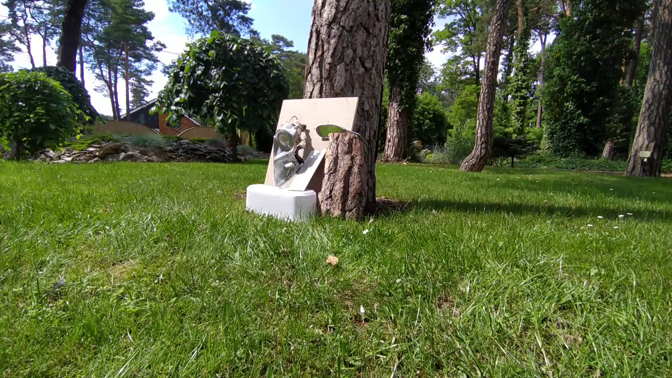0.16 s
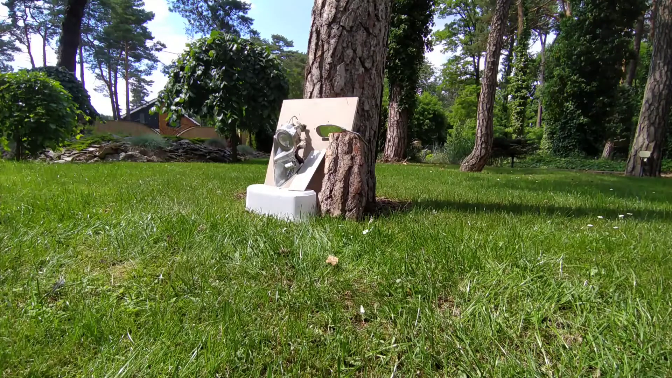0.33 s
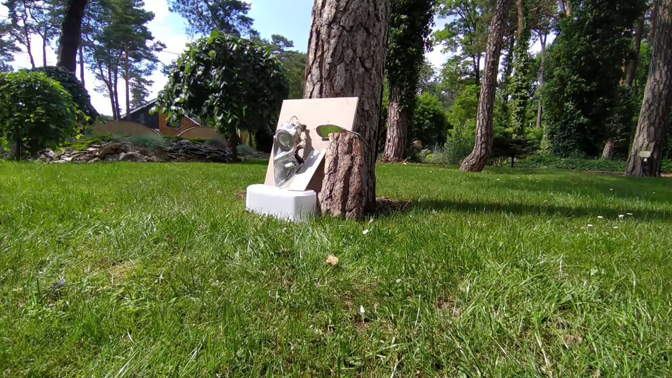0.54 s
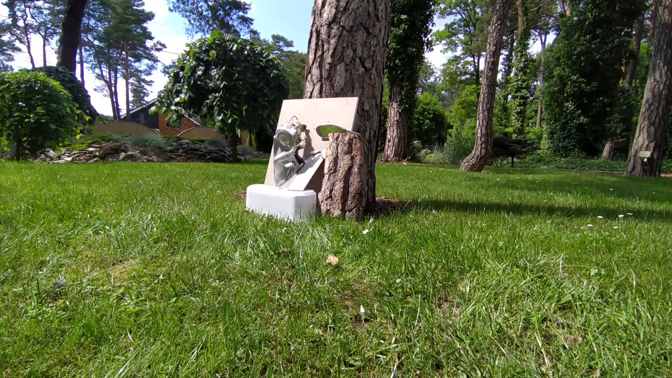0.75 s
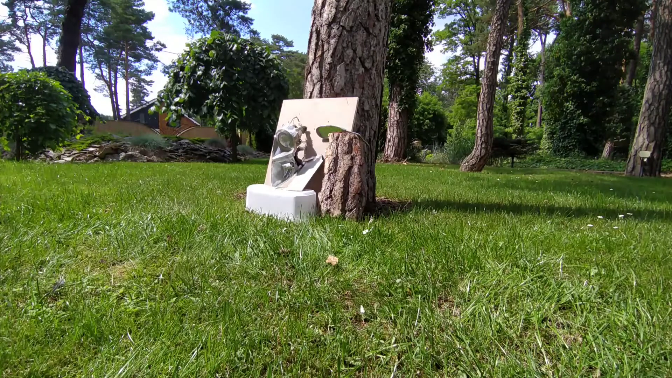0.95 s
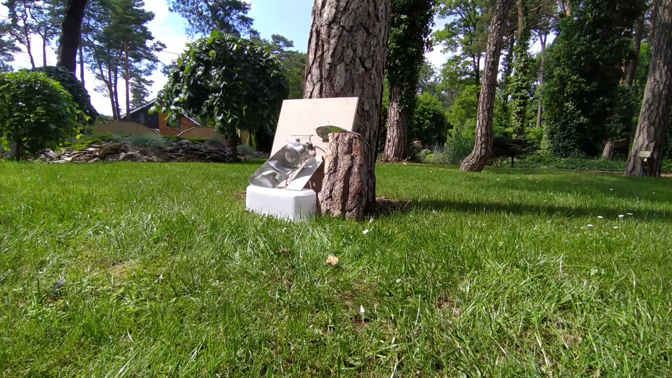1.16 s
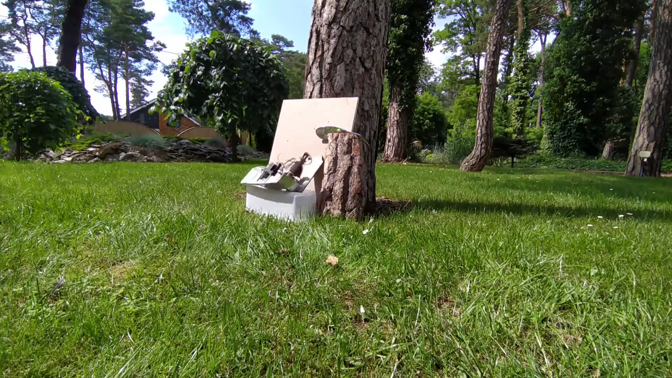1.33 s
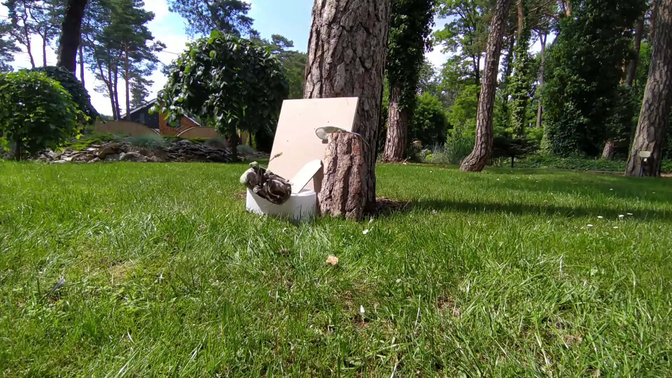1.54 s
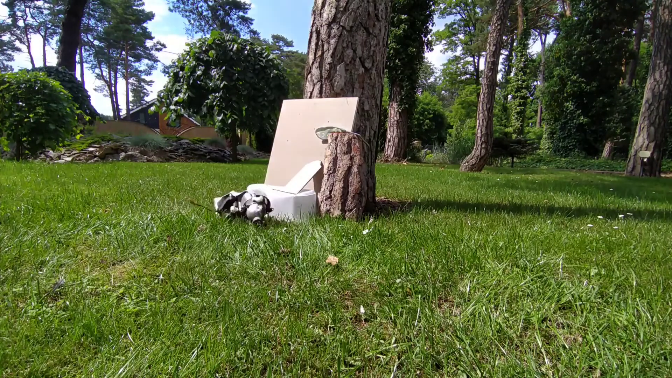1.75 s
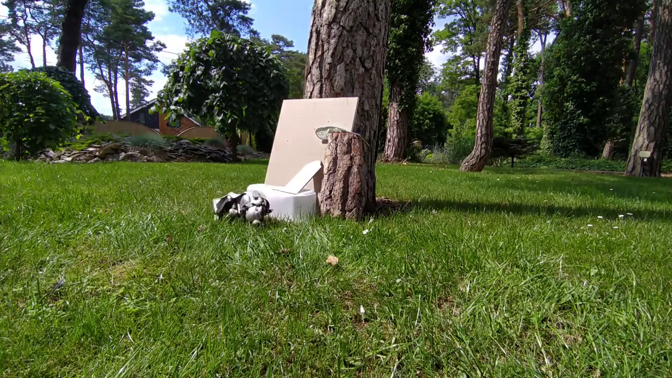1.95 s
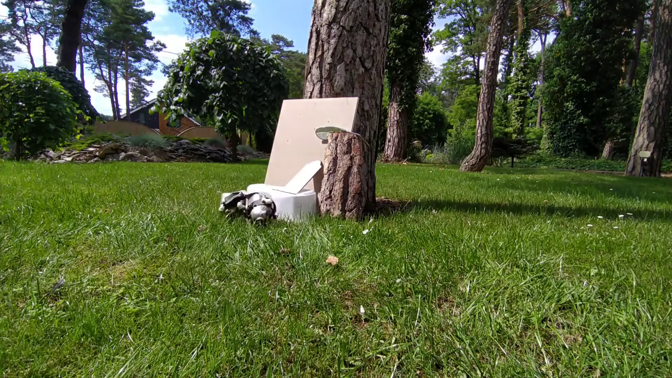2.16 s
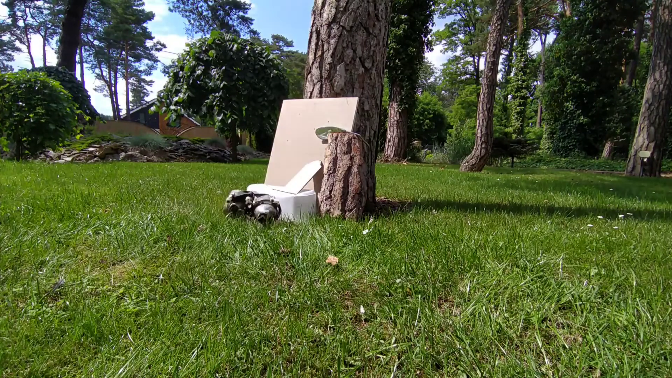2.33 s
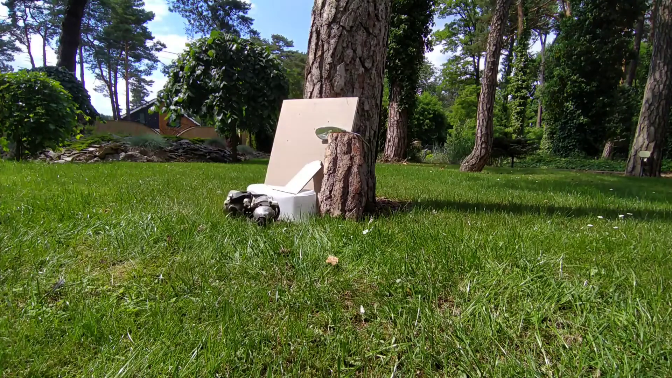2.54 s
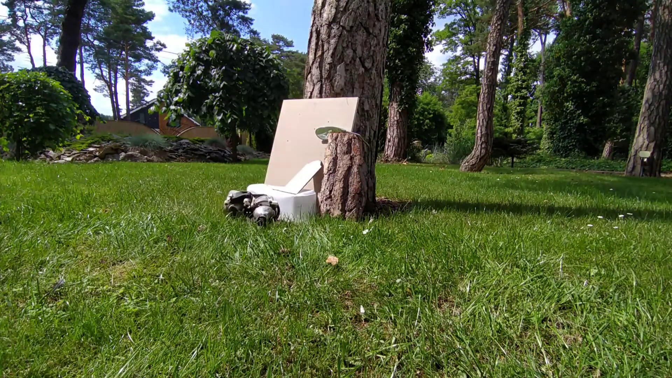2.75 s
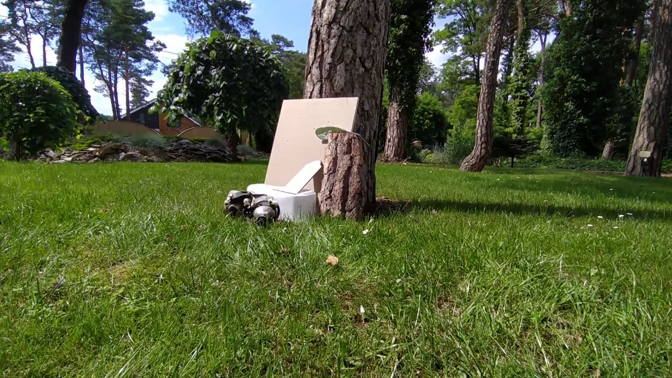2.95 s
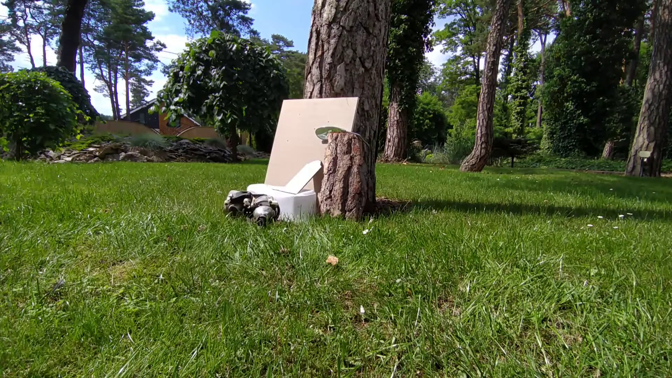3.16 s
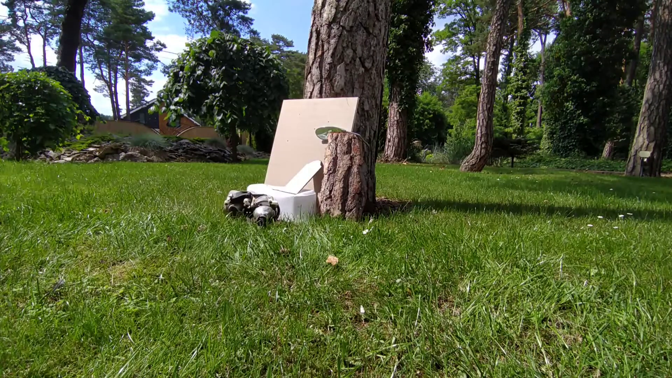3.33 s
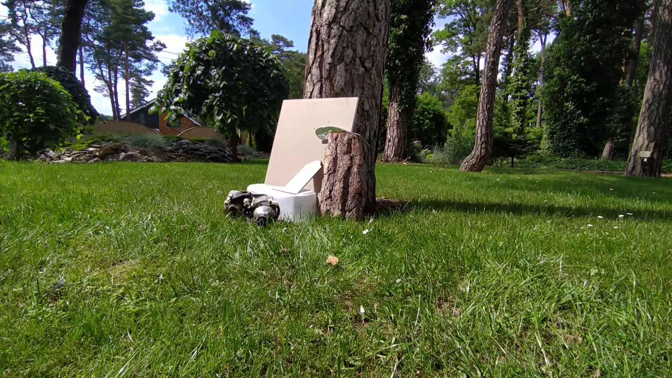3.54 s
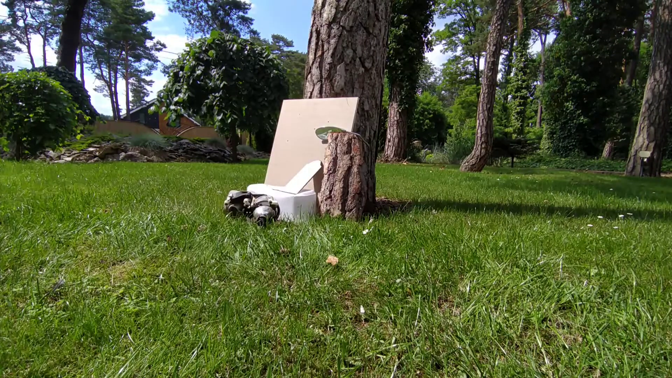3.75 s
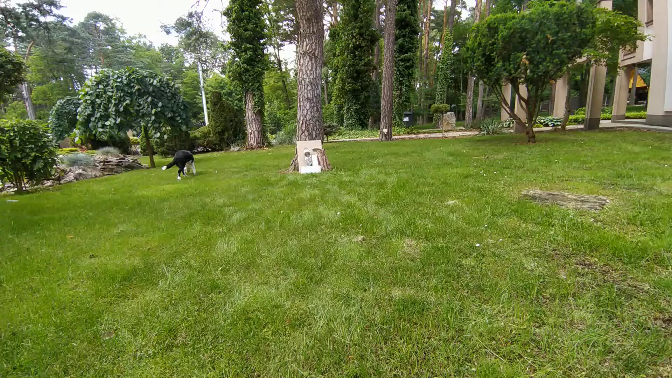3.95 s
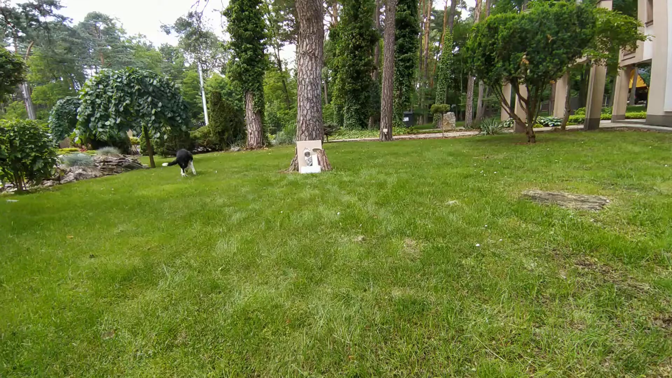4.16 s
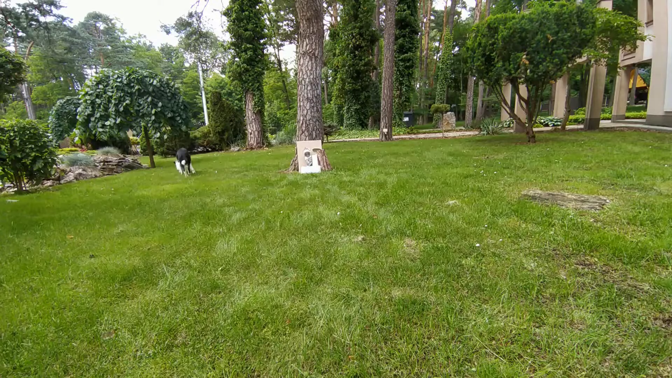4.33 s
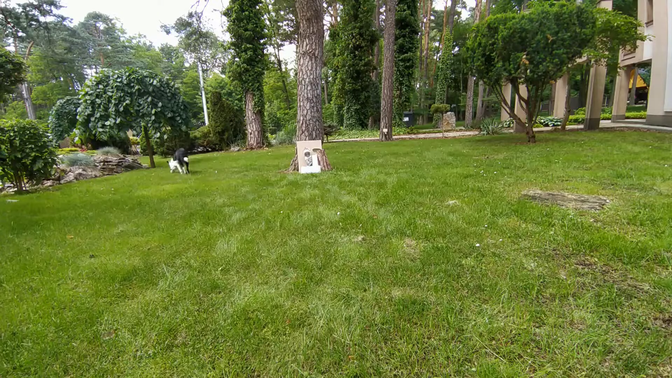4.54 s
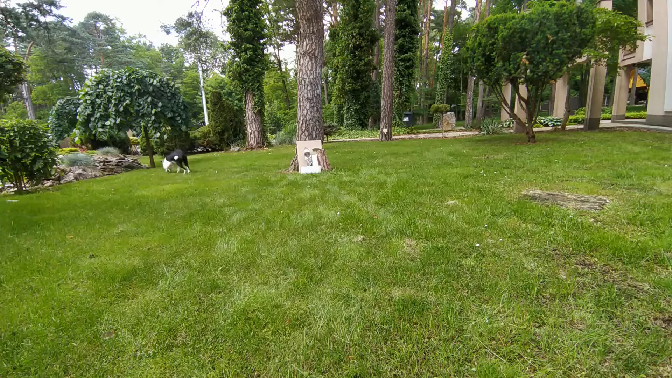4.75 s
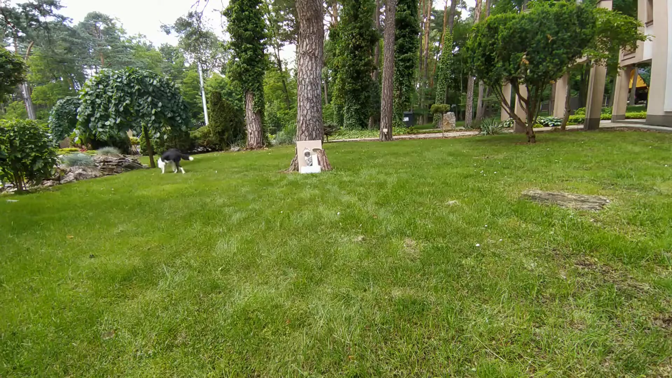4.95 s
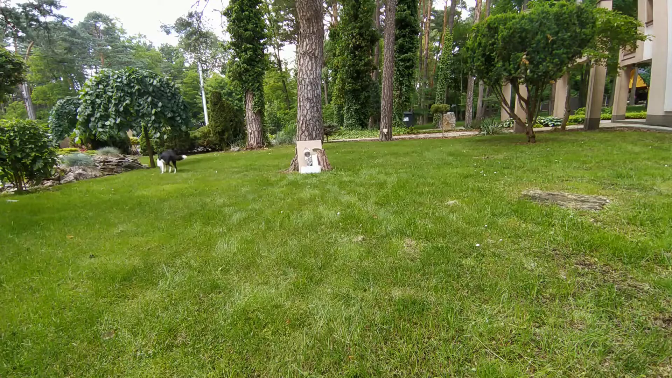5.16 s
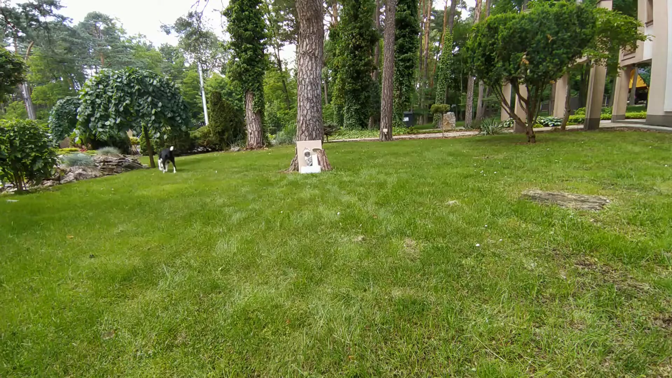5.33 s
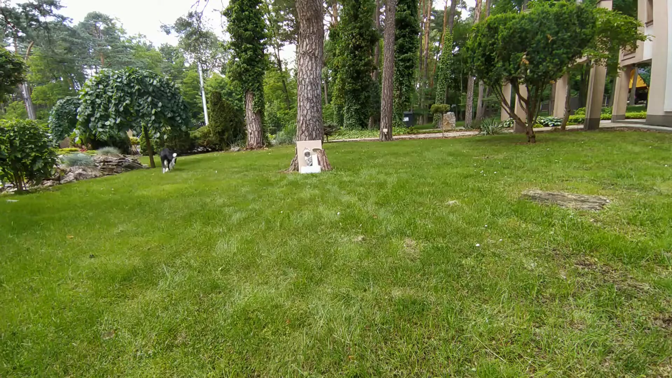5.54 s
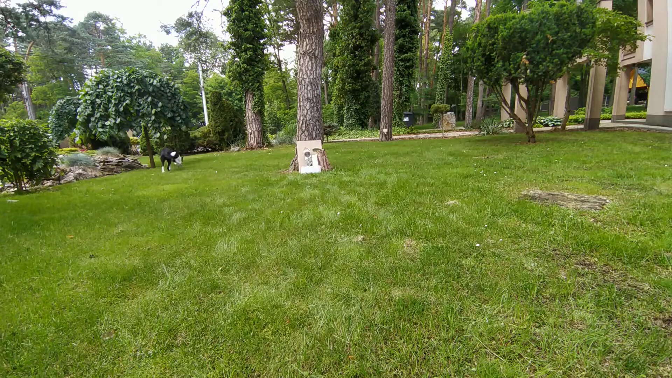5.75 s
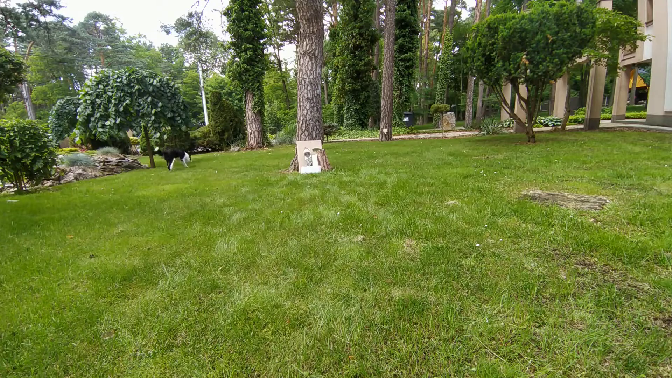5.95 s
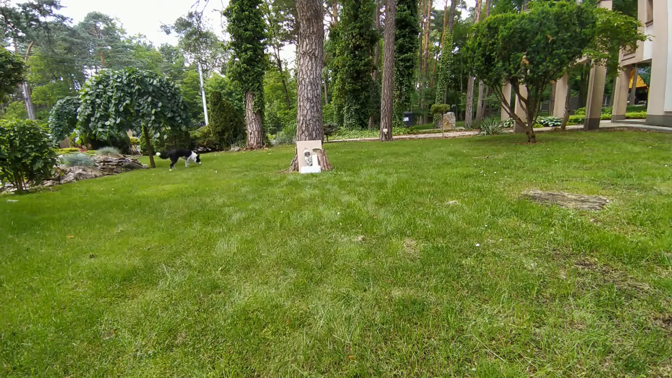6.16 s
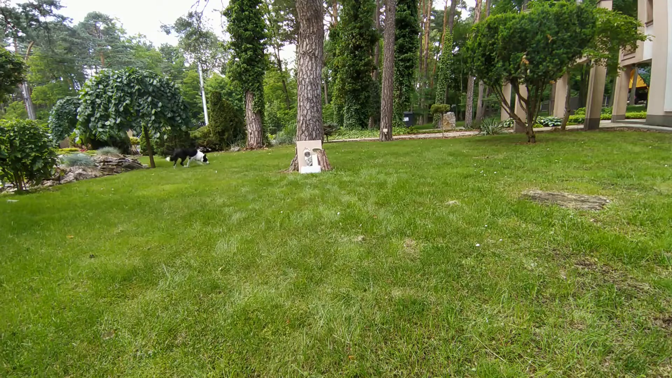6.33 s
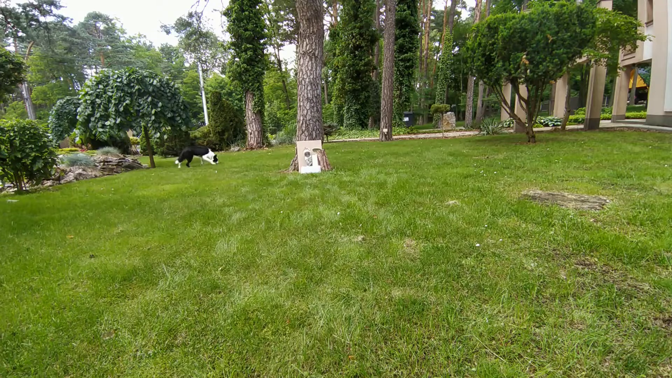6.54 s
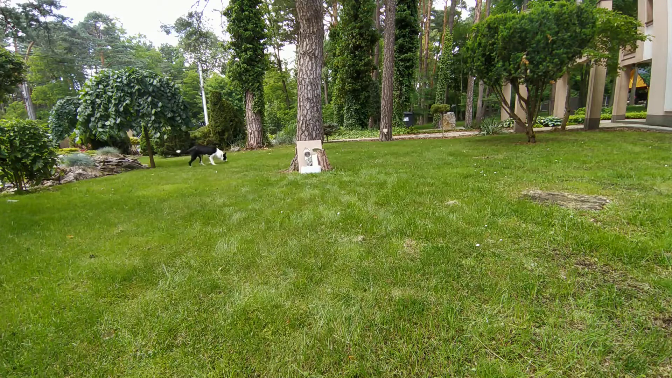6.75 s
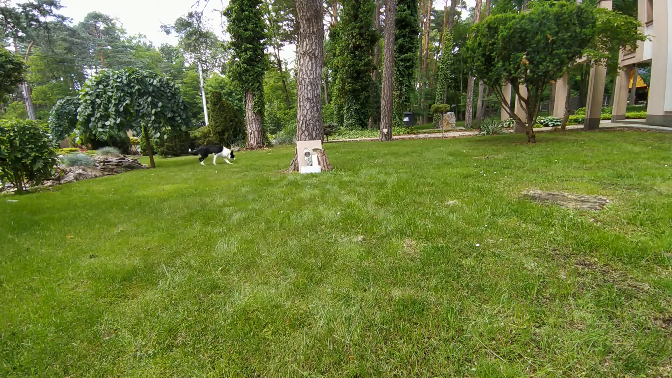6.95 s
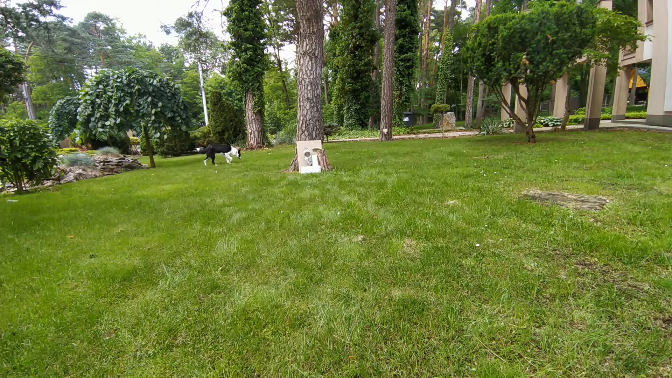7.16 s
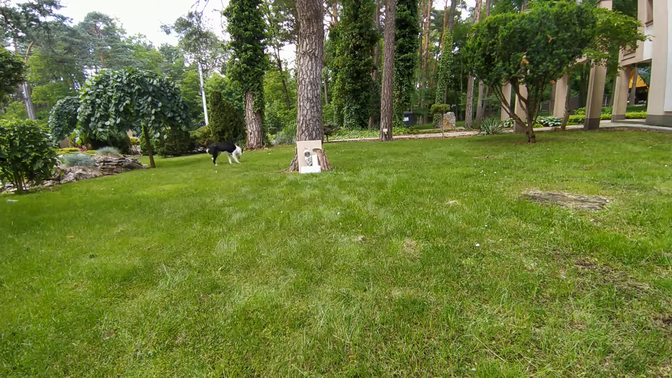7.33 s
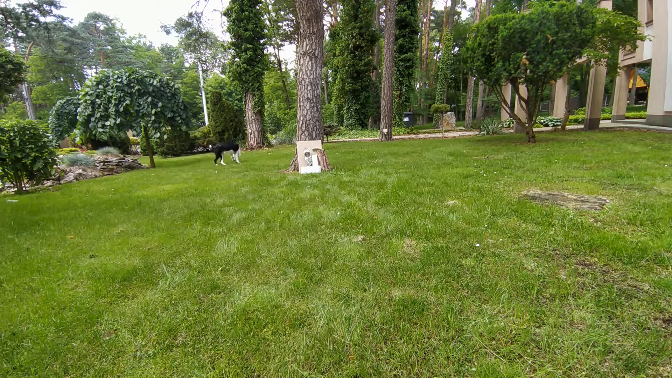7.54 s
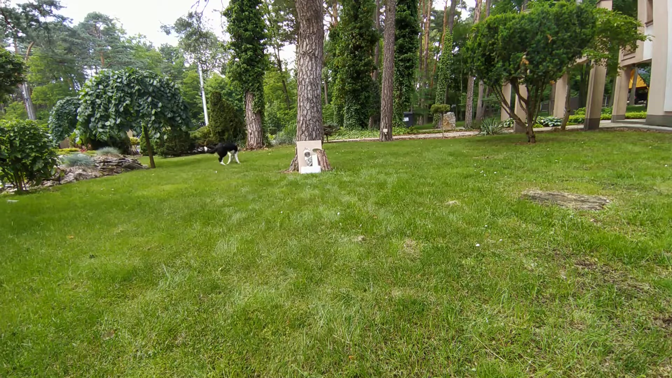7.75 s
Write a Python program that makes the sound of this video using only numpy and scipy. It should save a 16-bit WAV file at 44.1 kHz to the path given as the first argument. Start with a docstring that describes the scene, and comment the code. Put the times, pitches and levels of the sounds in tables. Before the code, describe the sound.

One sharp, ringing air rifle shot, hollow metal knocks and scrapes, buzzing finch song, a brief silence, then faint birds in soft garden air.

```python
"""On a lawn, birds far in the pines are faint before an air rifle fires close on the left of the microphone.
Blows of noise and ringing modes make its clatter and steel; slow pressure lobes make the puff of air.
The metal target is struck, sings in beating pairs of modes, scrapes, knocks and tumbles into the grass.
As it settles a near finch sings in gliding, buzzing tones; motors hum far off under a noise breeze.
After a short silence the garden is heard from further back: a low hum, one tick and distant birds."""
import sys
import numpy as np
from scipy import signal
from scipy.fft import rfft, irfft
from scipy.io import wavfile
from scipy.ndimage import uniform_filter1d

SR = 44100
rng = np.random.default_rng(int(sys.argv[2]) if len(sys.argv) > 2 else 0)


def dump_mix(stems):
    """Bounce the given channels to the path in sys.argv[1] as a 16-bit WAV at rate SR."""
    frames = np.atleast_2d(stems).T  # one column per channel
    limited = np.clip(frames, -1, 1)  # hard clip at full scale
    pcm = np.round(limited * 32767).astype(np.int16)
    wavfile.write(sys.argv[1], SR, pcm)


N = 343980
T = np.arange(N) / SR  # s
RING = T[:17640]  # time within one blow, s
NEAR_END_S, FAR_START_S = 3.857, 4.205  # silence between the two microphone spots


def db_to_gain(db):
    """Decibels to gain."""
    return 10 ** (np.asarray(db) / 20)


def unit(x):
    """Scale to rms 1."""
    return x / np.sqrt(np.mean(x ** 2))


def over_hz(rows, hz):
    """Read a (f/Hz, value) table on a log-frequency axis."""
    rows = np.array(rows, float)
    return np.interp(np.log(hz + 1), np.log(rows[:, 0]), rows[:, 1])


def add(out, s, x):
    """Mix x in from time s."""
    i = int(s * SR)
    out[..., i:i + x.shape[-1]] += x[..., :max(N - i, 0)]


def fade(t60):
    """Exponential decay by 60 dB in t60 seconds, 5 ms at the shortest."""
    return np.exp(-np.log(1000) * RING / max(t60, .005))


def noise(colour, size, alike_hz, tilt_db=0, likeness=0.91):
    """Coloured stereo noise of rms 1; the two sides grow less alike above alike_hz."""
    hz = np.fft.rfftfreq(size, 1 / SR)
    mid, side = rfft(rng.standard_normal((2, size)))
    alike = np.clip(likeness, 0, 1) / (1 + (hz / alike_hz) ** 2)
    mid, side = mid * np.sqrt(1 + alike), side * np.sqrt(1 - alike)
    tilt = tilt_db * np.log2(np.maximum(hz, 250) / 1000)
    spectrum = db_to_gain(over_hz(colour, hz) + tilt) * (hz > 12)
    return unit(irfft(np.array([mid + side, mid - side]) * spectrum, size))


def place(x, lead_ms, pan_db):
    """A source to the left reaches the left port first; a positive pan makes that side louder."""
    right = np.interp(T - lead_ms / 1000, T, x[1])
    return np.array([x[0] * db_to_gain(pan_db / 2), right * db_to_gain(-pan_db / 2)])


def walk(rate):
    """Chance drift with a spread near 1, taking `rate` new values a second."""
    return 1.2 * np.interp(T * rate, np.arange(400), rng.standard_normal(400))


def swells(rows, attack_s, fall_db_per_s):
    """Attack, hold and steady fall for each (start s, held s, dB) row; the strongest one leads."""
    curves = []
    for s, held, db in rows:
        falling_s = np.maximum(T - s - attack_s - held, 0)
        attack = np.clip((T - s) / attack_s, 0, 1)
        curves.append(attack * db_to_gain(db - fall_db_per_s * falling_s))
    return np.max(curves, axis=0)


def modes(rows, scatter_db):
    """Partials build over a few cycles and decay; levels vary by blow, phases also between the ports."""
    out = np.zeros((2, len(RING)))
    for hz, db, t60 in rows:
        turn, size, spread = rng.standard_normal(3)
        phase = 2 * np.pi * turn + spread * min(hz / 8000, 1) * np.array([[.7], [-.7]])
        level = db_to_gain(db + scatter_db * size)
        swell = 1 - np.exp(-RING * hz / 4)
        out += level * swell * fade(t60) * np.sin(2 * np.pi * hz * RING + phase)
    return out


RESONANCE_SPACING_HZ = 105  # between the random points of a metal body's response
CONTACT_T60_S = .009  # the bare crack that opens each blow


def blows(events, colour, decay, partials, ring_db, alike_hz, likeness, rise_cycles, uneven_db, contact_db):
    """Each blow cracks, then excites one shared thicket of resonances in bands, and a few clear modes."""
    out, hz = np.zeros((2, N)), np.fft.rfftfreq(len(RING), 1 / SR)
    # overlapping bands, each with its own swell and decay; low bands swell more slowly
    bands = [over_hz([(f, f == centre) for f, _ in decay], hz) for centre, _ in decay]
    band_swells = [1 - np.exp(-RING * max(f, 300) / rise_cycles) for f, _ in decay]
    peaks = np.interp(hz / RESONANCE_SPACING_HZ, np.arange(len(hz)), rng.standard_normal(len(hz)))
    thicket = unit(db_to_gain(uneven_db * peaks * np.minimum(hz / 2000, 1)))

    def blow(tilt_db, length, pitch=1):
        """One blow; its pitch factor moves the body's colour and modes together."""
        crack = noise([(f * pitch, d) for f, d in colour], len(RING), alike_hz, tilt_db, likeness)
        body = rfft(crack) * thicket
        hit = 0
        for band, swell, (_, t60) in zip(bands, band_swells, decay):
            hit = hit + irfft(body * band) * swell * fade(t60 * length)
        ring = modes([(f * pitch, d, t60 * length) for f, d, t60 in partials], scatter_db=2.0)
        contact = crack * fade(CONTACT_T60_S)
        return hit + db_to_gain(ring_db) * ring + db_to_gain(contact_db) * contact

    for s, db, *shape in events:
        add(out, s, db_to_gain(db) * blow(*shape))
    return out


def trees(x, t60, wet_db, colour):
    """Trunks and foliage scatter a thin diffuse tail."""
    tail = noise(colour, len(RING), 400) * fade(t60) * (1 - np.exp(-RING / 0.0077))
    tail /= np.sqrt(np.sum(tail ** 2) / 2)
    return x + db_to_gain(wet_db) * signal.fftconvolve(x, tail, axes=1)[:, :N]


TRUNK_DELAYS_S = (.028, 0.11)  # nearest and furthest echo, before random scatter


def trunks(x, echo_db, count):
    """Single trunks send back separate faint echoes, weaker with delay."""
    delays = np.linspace(*TRUNK_DELAYS_S, count) * (1 + .1 * rng.standard_normal((2, count)))
    echoes = [sum(np.interp(T - d, T, side) * TRUNK_DELAYS_S[0] / d for d in side_delays)
              for side, side_delays in zip(x, delays)]
    return x + db_to_gain(echo_db) * np.array(echoes)


MOTOR_ATTACK_S, MOTOR_FALL_DB_PER_S = 0.21, 10.5


def motor(hz, spells, orders):
    """A far engine's harmonic lines waver in pitch and level and swell for each spell."""
    phase = 2 * np.pi * np.cumsum(hz + .2 * walk(7.2)) / SR
    lines = 0
    for k, db in orders:
        lines = lines + np.sqrt(2) * db_to_gain(db + 0.7 * walk(3.4)) * np.sin(round(k) * phase)
    return lines * swells(spells, MOTOR_ATTACK_S, MOTOR_FALL_DB_PER_S)


# colour of the garden air near the target: f/Hz, relative level/dB
NEAR_AIR = [(15, -33), (25, -14.5), (48, -4), (115, -13), (224, -8), (264, -13), (450, -21.5), (488, -25.5),
            (749, -17.5), (978, -21), (2180, -25.5), (3350, -40), (6000, -46.5), (9300, -43.5),
            (15000, -65)]
# colour of the garden air further back: f/Hz, relative level/dB
FAR_AIR = [(25, 1.5), (66, -4), (120, -13), (170, -6), (280, -13), (600, -17.5), (880, -12.5),
           (1600, -16.5), (2700, -22.5), (3700, -32), (7000, -34), (9200, -30), (11000, -42.5),
           (15000, -50)]
# swells of a distant engine: start t/s, held t/s, level/dB
DRONE = [(-.25, .75, -56), (.5, 2, -55.5), (2.65, 1, -52.5)]
# harmonic lines of that engine: multiple of its pitch, relative level/dB
DRONE_ORDERS = [(1, -3), (2, -9.5), (3, -11.5), (5, -11.5)]
# low hums that come and go: f/Hz, start t/s, held t/s, level/dB
HUMS = [(91.5, 2.25, .05, -57.5), (121, 4.0, 0.28, -59), (70.5, 4.9, .6, -67), (119, 6.35, 0.81, -63)]
DRONE_HZ = 46.6
# the breeze picks up at the near spot and eases at the far one
BREEZE_DB, LULL_DB, BREEZE_RISE_S = -51.5, -5, 1.2
FAR_AIR_DB, EASING_DB_PER_S = -54.5, 0.99


def garden():
    """Soft air in the trees as coloured noise with far motors, different at the two spots."""
    breeze_db = BREEZE_DB + LULL_DB * np.exp(-T / BREEZE_RISE_S) + .5 * walk(6.2)
    near = noise(NEAR_AIR, N, 540) * db_to_gain(breeze_db)
    easing_db = FAR_AIR_DB - EASING_DB_PER_S * (T - FAR_START_S) + .5 * walk(5.5)
    far = noise(FAR_AIR, N, 420) * db_to_gain(easing_db)
    hums = sum(motor(hz, [spell], [(1, 0)]) for hz, *spell in HUMS)
    return np.where(T < NEAR_END_S, near + motor(DRONE_HZ, DRONE, DRONE_ORDERS), far) + hums


STROKE_ROUNDNESS, STROKE_SAG_DB = 0.44, 3  # every stroke swells, weakens and closes alike
OVERTONE_DB = -26.5  # the octave in a bird's whistle


def stroke(length, from_hz, to_hz, db, buzz, bend, buzz_hz, rough, tremble_db):
    """A gliding whistle; a fast, uneven flutter of the syrinx makes it buzz."""
    u = np.linspace(0, 1, int(length * SR), endpoint=False)
    hz = to_hz + (from_hz - to_hz) * (1 - u) ** bend
    wobble, tremble = (unit(uniform_filter1d(rng.standard_normal(len(RING)), size=40))[:len(u)]
                       for _ in range(2))
    flutter = np.sin(2 * np.pi * np.cumsum(buzz_hz * (1 + .5 * wobble)) / SR) + rough * tremble
    phase = 2 * np.pi * np.cumsum(hz * (1 + buzz * flutter + .005 * wobble)) / SR
    tone = np.sin(phase) + db_to_gain(OVERTONE_DB) * np.sin(2 * phase) * (hz < SR / 8)
    level = db_to_gain(db - STROKE_SAG_DB * u + tremble_db * tremble)
    return np.sqrt(2) * level * np.sin(np.pi * u) ** STROKE_ROUNDNESS * tone


# each syllable is one or more strokes of the syrinx: offset t/s from the syllable's start, length t/s,
# from f/Hz, to f/Hz (both before scatter), relative level/dB, buzz depth as a share of the pitch,
# bend (over 1 glides early and levels off)
SYLLABLES = { "whistle": [(0.0022, .09, 5650, 4870, -3, 0.043, 6.8)],
             "trill": [(0, 0.0054, 5100, 6070, -1, 0.014, 1.1), (.003, 0.0118, 6240, 4750, -.5, 0.01, 0.94),
             (.018, 0.0068, 3920, 4700, -1, 0.018, 1.1), (.023, 0.012, 4660, 4250, 5, 0.02, 1.1),
             (.027, 0.0248, 4100, 3155, 4, 0.11, 1.485), (.058, 0.013, 4650, 4270, -19.5, 0.018, 1)],
             "loop": [(0, 0.0088, 6340, 4700, -12, .01, 1), (.016, .026, 3420, 2610, 1, 0.01, 0.623),
             (.044, .03, 2700, 5190, 3, 0.072, 1.4), (.069, .028, 4400, 2680, 0.5, 0.088, 1.51)],
             "rasp": [(0, 0.021, 5600, 8060, -3.5, .14, 1.1),
             (.014, 0.0363, 6620, 7380, -4.5, 0.227, 1.54)], "drop": [(0, .04, 4200, 2700, 4, 0.11, 0.97)],
             "flourish": [(0, 0.0235, 2625, 3200, -0.5, 0.02, 1.33), (.029, .016, 4480, 4260, 1, .02, 1),
             (.044, 0.0123, 3990, 5090, 3.5, 0.022, 1.5), (.058, .026, 5230, 4790, -4.5, 0.022, 1.02),
             (.078, .038, 4860, 4150, 1, 0.053, 1), (.1, .075, 3990, 3155, 2.5, 0.13, 1.2),
             (.16, .11, 3170, 2300, -1.5, .1, 1)], "slide": [(0, .135, 8600, 4420, -2.5, 0.004, 2.7),
             (.11, .1, 4400, 4700, -6.5, .003, 0.55)], "lift": [(0.005, .05, 4680, 5900, 2, .005, 0.4)],
             "pip": [(0, 0.093, 4650, 4560, -0.5, 0.0068, 0.79)], "seep": [(0, .09, 8200, 7900, 0, .02, 1)],
             "peep": [(0, 0.12, 3250, 3180, -2, 0.003, 1)], "call": [(.004, .055, 4560, 4290, 0, .012, 2),
             (.072, .055, 4380, 4280, -.5, .008, 1)], "flick": [(0, 0.038, 4600, 3800, 6.5, .015, 0.96)],
             "chip": [(0, .02, 3750, 3000, 4, 0.03, 1.07)],
             "churr": [(0, 0.025, 3560, 3430, -1, 0.025, 1.05), (.016, .018, 2750, 3350, 0, .02, 1),
             (.033, .045, 3050, 2740, 3, 0.08, 1.31)], "chirp": [(.004, .024, 2350, 3480, 2, 0.015, 0.97),
             (.033, 0.033, 2980, 2740, 3.5, 0.09, 1)]}
STROKE_SCATTER = 0.0073  # share of the pitch


def sing(song, buzz_hz, rough, tremble_db):
    """Each phrase repeats one syllable at an even pace; no two strokes are quite alike."""
    out = np.zeros((2, N))
    for name, first, last, count, db, crescendo_db in song:
        for u in np.linspace(0, 1, round(count)):
            for offset, length, from_hz, to_hz, *shape in SYLLABLES[name]:
                start, end = 1 + STROKE_SCATTER * rng.standard_normal(2)
                note = stroke(length, from_hz * start, to_hz * end, *shape, buzz_hz, rough, tremble_db)
                add(out, first + u * (last - first) + offset, db_to_gain(db + u * crescendo_db) * note)
    return out


# phrases of the near finch: syllable, first t/s, last t/s, count, level/dB, crescendo/dB
SONG = [("whistle", 1.948, 1.948, 1, -41, 0), ("trill", 2.094, 2.714, 9, -47, 4.6),
        ("loop", 2.796, 3.074, 3, -41, 0.96), ("rasp", 3.21, 3.28, 2, -42, -1.4),
        ("drop", 3.353, 3.353, 1, -45.5, 0), ("flourish", 3.436, 3.436, 1, -42.5, 0)]
# phrases of birds deeper in the pines: syllable, first t/s, last t/s, count, level/dB, crescendo/dB
FAR_SONG = [("seep", .75, .925, 2, -69, 4), ("peep", 4.33, 4.33, 1, -70, 0),
            ("call", 5.01, 5.01, 1, -66, 0), ("seep", 5.73, 5.73, 1, -76, 0),
            ("pip", 6.04, 6.19, 2, -78, 4), ("chip", 6.291, 6.69, 7, -73, 3.5),
            ("lift", 6.615, 6.615, 1, -73, 0), ("slide", 6.436, 7.732, 4, -66, 6),
            ("flick", 6.756, 7.624, 3, -76, 1), ("churr", 6.831, 7.161, 3, -67, 0),
            ("chirp", 7.334, 7.626, 3, -68, 0)]
# the near song's high overtones, blurred into soft treble noise: start t/s, held t/s, level/dB
SONG_HISS = [(1.95, 0.89, -66)]


def birds():
    """A finch close on the left with trunk echoes; others further off, more diffuse among the trees."""
    near = place(sing(SONG, buzz_hz=330, rough=0.3, tremble_db=2.0), lead_ms=0.3704, pan_db=0.3)
    far = place(sing(FAR_SONG, buzz_hz=120, rough=0.3, tremble_db=2.2), lead_ms=.02, pan_db=-1.5)
    hiss_colour = [(5000, -42.0), (7500, -5), (8800, -.5), (10500, -7.0), (15000, -15.0)]
    hiss = noise(hiss_colour, N, 2020) * swells(SONG_HISS, attack_s=0.11, fall_db_per_s=17)
    nearly_flat = [(2000, 0), (10000, -1)]
    near = trees(trunks(near, echo_db=-16, count=5), t60=0.5, wet_db=-7, colour=nearly_flat)
    far = trees(far, t60=.45, wet_db=-3, colour=nearly_flat)
    return near + far + hiss


def tick():
    """One small bright tick in the distance: a noise burst with a short and a long decay."""
    out = np.zeros((2, N))
    colour = [(2000, -28), (4500, -16), (7000, -11), (9300, 7.0), (11000, -9.5), (15000, -20)]
    decay = db_to_gain(-47.5) * fade(0.032) + db_to_gain(-63.5) * fade(0.39)
    add(out, 4.935, noise(colour, len(RING), 5900) * decay)
    return out


# light random knocks while the target is on the move
RATTLE_SPAN_S, RATTLE_DB, RATTLE_SCATTER_DB = (1.09, 1.4), -42, 3.5
RATTLE_TILT_DB, RATTLE_LENGTH = -0.5, 0.62  # treble tilt per octave; factor on the decay times


def rattle(count):
    """Small knocks at uneven moments."""
    first, last = RATTLE_SPAN_S
    knocks = []
    for k, (when, size) in enumerate(rng.random((count, 2))):
        s = first + (last - first) * (k + when) / count
        db = RATTLE_DB + RATTLE_SCATTER_DB * (2 * size - 1)
        knocks.append((s, db, RATTLE_TILT_DB, RATTLE_LENGTH))
    return knocks


# modes of the target's thin metal wall: f/Hz, relative level/dB, t60 t/s before the length factor
WALL = [(1152, -7, .25), (1782, -12, .25), (2140, -8, .25), (2630, 0, .26), (2830, -8, .2), (3020, -8, .18),
        (3171, -3, .17), (3655, -8, .25), (3770, -7, .25), (4060, -10, .18), (4256, -9, .35),
        (4667, -1.5, .3), (4980, -11, .3), (5250, -14, .25), (6400, -7, .35), (7000, -7, .25)]
WALL_SPLIT = .005  # spread within a pair of modes, as a share of the pitch


def wall(length):
    """The dented wall rings in close pairs that beat, differently at every blow."""
    detune = 1 + WALL_SPLIT * rng.standard_normal((len(WALL), 2))
    pairs = [(hz * d, db, t60 * length) for (hz, db, t60), pair in zip(WALL, detune) for d in pair]
    return modes(pairs, scatter_db=1.5)


# the target's knocks as it tumbles; the pitch depends on where it is struck:
# t/s, level/dB, treble tilt/dB per octave, length factor, pitch factor
TUMBLE = [(1.341, -27.5, 0.5, 0.79, 1.11), (1.355, -31.5, 1.5, .9, 1.07), (1.460, -21.5, 0, 1.26, 1.07),
          (1.468, -20, -3.5, 0.68, 1.12), (1.477, -21.5, -6, 0.59, 1.05), (1.4996, -11, 0.7, 0.84, 0.96),
          (1.506, -14, -4.5, 0.56, 1.45), (1.511, -15, -3, 0.54, 0.84), (1.525, -24, -1.5, 0.88, 0.92),
          (1.533, -24, -4, 0.52, 0.9), (1.555, -24.5, -2.5, 1.04, 0.9), (1.576, -26, 4.5, 1.3, 1.01),
          (1.597, -28, -3, 1.4, 1.1), (1.612, -31.5, -1, 1.1, 1.05), (1.625, -25.5, -4.5, .9, 1),
          (1.633, -20.5, 3.5, 1, 1.05), (1.646, -22, -1, 0.77, 1), (1.6515, -9, 1.5, 0.5, .92),
          (1.654, -13, 2, 0.4, 1), (1.661, -16.5, -.5, 0.45, 1.1), (1.686, -28.5, 1.5, .8, 1.1),
          (1.712, -18.5, -2.5, 0.64, 0.94), (1.752, -33, -7.5, 1.1, 0.95), (1.7835, -32, 3.5, 0.74, 1),
          (1.81, -29.5, 6, 0.69, 0.96), (1.885, -19.5, -.4, 0.84, 1.05), (2.020, -30, -2, 0.83, 0.99),
          (2.118, -38, 4.5, 0.49, 1.05), (2.15, -43.5, -2, 0.74, 1.14)]
# colour of a knock: f/Hz before the pitch factor, relative level/dB
BODY_COLOUR = [(35, -66.5), (60, -46), (81, -33), (236, -9), (278, -11), (443, -1), (585, -16), (705, -8.5),
               (976, -13.5), (1480, -14), (2150, -13.5), (2470, -12.5), (5080, -20), (6700, -21),
               (9200, -16), (15500, -53.5)]
# decay of a knock by band: f/Hz, t60 t/s before the length factor
BODY_DECAY = [(150, 0.29), (400, 0.23), (1000, 0.16), (3000, 0.091), (8000, 0.037), (14000, 0.093)]
# modes of the hollow target: f/Hz, relative level/dB, t60 t/s, before the pitch and length factors
BODY = [(197.3, -11, 0.2), (247, -6.5, 0.5), (315, 1.5, 0.095), (413.5, -3.5, 0.206), (550, -4.5, 0.14),
        (857, -4, .12), (1533, -6, 0.14), (1763, -9.5, 0.14), (2560, -15.5, .12), (2950, -14, 0.11),
        (4570, -25, 0.26)]
# blows that set the wall singing: t/s, level/dB, length factor
WALL_BLOWS = [(1.033, -31, 1.17), (1.291, -46.5, .8), (1.341, -36.5, 0.39), (1.501, -39.5, 0.67),
              (1.653, -41.5, 0.6)]
# the target slides after each jolt and friction stops it: start t/s, held t/s, level/dB
SLIDES = [(1.07, .012, -36), (1.26, 0.054, -39.5), (1.50, .02, -31), (1.625, .005, -37), (1.80, 0.13, -50)]
# colour of the scrape: f/Hz, relative level/dB
SCRAPE_COLOUR = [(300, -0.5), (1000, -4.5), (2800, -3.5), (5500, -9), (7000, -8.5), (9300, -0.5),
                 (11000, -16.5), (15000, -33)]
# modes of a small metal piece: f/Hz, relative level/dB, t60 t/s
PING = [(7920, -4.5, 0.22), (9290, -3, 0.059), (12000, -1.5, 0.051)]
SLIDE_ATTACK_S, SLIDE_FALL_DB_PER_S = 0.018, 108.5


def target():
    """The target takes the pellet, sings, scrapes, pings and knocks its way down to the grass."""
    out = blows(TUMBLE + rattle(count=6), BODY_COLOUR, BODY_DECAY, BODY, ring_db=-11.5, alike_hz=3200,
                likeness=1.0, rise_cycles=1.1, uneven_db=3.0, contact_db=-10.5)
    # the pellet's hollow thock
    thock = modes([(740, -12, 0.074), (910, -33, .12)], scatter_db=1.0)
    add(out, 1.024, thock)
    for s, db, length in WALL_BLOWS:
        add(out, s, db_to_gain(db) * wall(length))

    # random grains of 60 samples roughen the scrape
    grain_db = 2.5 * rng.exponential(size=N // 60 + 1).clip(0, 4)
    grit = unit(uniform_filter1d(np.repeat(db_to_gain(grain_db), 60), 60))[:N]
    slide = swells(SLIDES, SLIDE_ATTACK_S, SLIDE_FALL_DB_PER_S) * db_to_gain(3.1 * walk(45))
    out += noise(SCRAPE_COLOUR, N, 4000) * grit * slide

    chink_colour = [(5000, -22.5), (8200, 5.0), (12500, -11.0), (14000, -33.5)]
    chink = noise(chink_colour, len(RING), 4000) * fade(.04)
    ping = modes(PING, scatter_db=-2.0)
    add(out, 1.289, db_to_gain(-23.0) * ping + db_to_gain(-26.5) * chink)
    return place(out, lead_ms=0.017, pan_db=-0.06)


# lobes of the muzzle's air puff: t/s, peak pressure before panning (1 is full scale), swell t/s
PUFF = [(.997, -0.17, 0.012), (1.052, 0.14, 0.059), (1.17, -0.032, 0.11)]


def puff():
    """Air from the muzzle sways the microphone: a quick suction, then a slow rebound."""
    out = np.zeros(N)
    for s, size, swell_s in PUFF:
        age = np.maximum(T - s, 0) / swell_s
        out += size * age ** 2 * np.exp(2 * (1 - age))
    return place(np.array([out, out]), lead_ms=0, pan_db=4.0)


# hard metal stops within the shot: t/s, level/dB, resonance f/Hz, t60 t/s, half width/octaves
CLACKS = [(.9905, -9.5, 2245, .024, .8), (.991, -14.5, 470, .05, 1.3), (1.003, -15.5, 229.8, .07, 1),
          (1.012, -17, 9480, .07, 0.18), (1.033, -15.5, 740, .04, 0.77), (1.0355, -14, 8600, .075, .05),
          (1.036, -16, 2400, .016, 1), (1.0463, -16.5, 2400, 0.018, 0.99), (1.0703, -14, 8500, .02, .14),
          (1.078, -25.5, 350, .041, 1)]
CLACK_SKIRT_DB = -20  # drop per half width, as set by points two half widths either side


def clacks():
    """Hard metal stops within the shot: each a short burst in one resonance, broad or narrow."""
    out = np.zeros((2, N))
    for s, db, hz, t60, octaves in CLACKS:
        colour = [(hz * 2 ** (k * octaves), abs(k) * CLACK_SKIRT_DB) for k in (-2, 0, 2)]
        burst = noise(colour, len(RING), 9000, likeness=.8) * (1 - np.exp(-RING * hz)) * fade(t60)
        add(out, s, db_to_gain(db) * burst)
    return out


# after the report the spring surges to and fro, duller each time
SPRING_S, SPRING_PERIOD_S, SPRING_DB = 1.001, .0102, -17.5
SPRING_TILT_DB, SPRING_DULLING_DB = 2, 2  # first treble tilt per octave, and its loss at each surge


def surges(count):
    """Evenly spaced blows of the spring after the report."""
    return [(SPRING_S + k * SPRING_PERIOD_S, SPRING_DB, SPRING_TILT_DB - k * SPRING_DULLING_DB, 1)
            for k in range(count)]


# trigger, piston, report, pellet strike and loose parts settling:
# t/s, level/dB, treble tilt/dB per octave, length factor
SHOT = [(.967, -46.5, -3, 0.96), (.976, -27, 0, 0.8), (.981, -21.5, 0, .8), (.9855, -15, 2.5, 0.81),
        (.990, -11.5, -2.6, 0.8), (1.022, -17, 4, 0.89), (1.033, -11.5, 1, 0.35), (1.044, -19, 2.5, 0.54),
        (1.076, -28.5, 2, 0.91), (1.147, -29.5, -1, 0.36), (1.216, -36.5, -1, 0.86),
        (1.242, -34, -2.5, 0.49)]
# colour of the shot: f/Hz, relative level/dB
SHOT_COLOUR = [(60, -19), (150, -10.5), (420, -12), (560, -11.5), (740, -8.5), (1000, -9.5), (1700, -12.5),
               (2350, -11), (3600, -20), (4800, -21), (5700, -23.5), (7200, -13), (8050, -18.5),
               (8600, -14.5), (9700, -14), (11000, -23), (14800, -31.5), (15500, -45.5)]
# decay of the shot by band: f/Hz, t60 t/s before the length factor
SHOT_DECAY = [(100, .14), (700, 0.31), (2500, 0.18), (8000, 0.21), (14000, 0.075)]
# modes of the ringing steel: f/Hz, relative level/dB, t60 t/s before the length factor
STEEL = [(409, -7, .15), (737, -3, .13), (2290, -7, .15), (2495, -9, .13), (6385, -13, .32),
         (7040, -6, .28), (7330, -7, .22), (7510, -7, .2), (7850, -8, .26), (8263, -4, .22),
         (8382, -5, .25), (8451, 2, .24), (8616, -1, .28), (8933, -6, .24), (9254, -5, .22),
         (9426, -7, .22), (9504, -4, .22), (9769, -6, .23), (9945, -8, .2), (10970, -17, .25),
         (11930, -19, .2), (12223, -16, .2)]


def rifle():
    """The shot, close by on the left: blows on ringing steel, spring surges and hard metal stops."""
    shot = blows(SHOT + surges(count=3), SHOT_COLOUR, SHOT_DECAY, STEEL, ring_db=-10, alike_hz=9000,
                 likeness=.75, rise_cycles=1.4, uneven_db=4.0, contact_db=-14)
    return place(shot, lead_ms=.41, pan_db=0.3) + place(clacks(), lead_ms=.41, pan_db=4.0)


def scene():
    """Shot and tumble echo from the trees over the garden's own sounds."""
    tail_colour = [(200, -3.5), (3000, -7.5), (9000, -0.5), (15000, -16.5)]
    action = trees(rifle() + target(), t60=0.55, wet_db=-20, colour=tail_colour)
    return action + puff() + tick() + birds() + garden()


TOP_HZ = 15600  # upper limit of the microphone chain


def record(dry):
    """The recorder pauses between the two spots, clips at full scale and cuts the top."""
    running = uniform_filter1d(1. * ((T < NEAR_END_S) | (T > FAR_START_S)), size=200)
    low_pass = signal.ellip(8, .1, 60, TOP_HZ, fs=SR, output="sos")
    return signal.sosfiltfilt(low_pass, np.clip(dry * running, -1, 1))


dry = scene()
out = record(dry)
dump_mix(out)
```